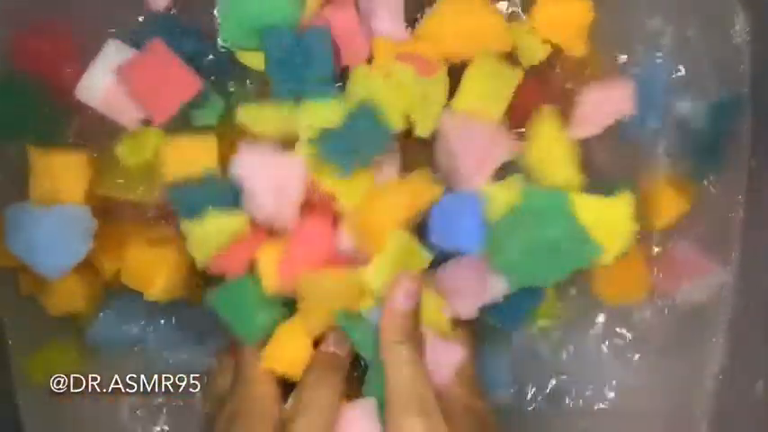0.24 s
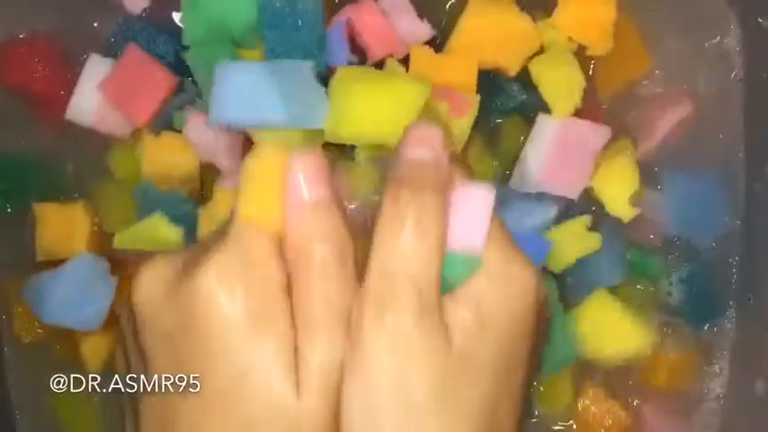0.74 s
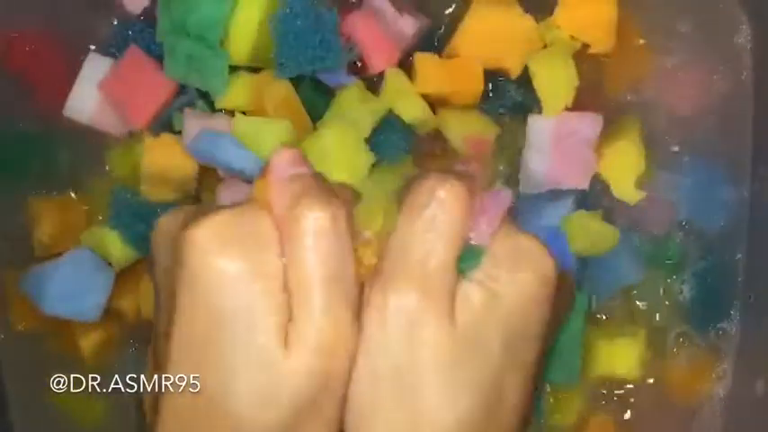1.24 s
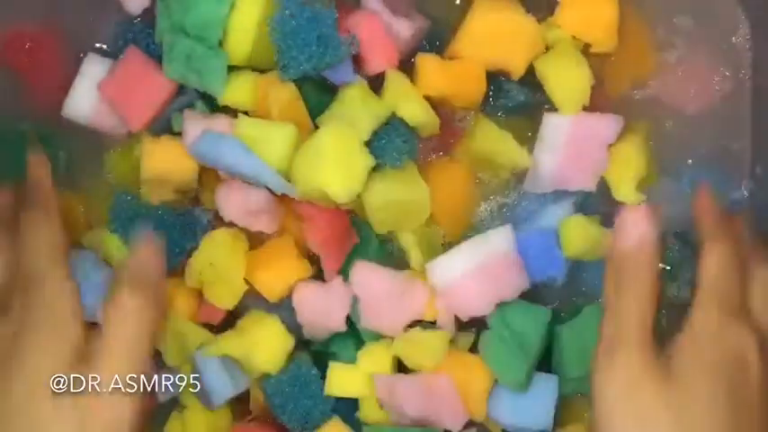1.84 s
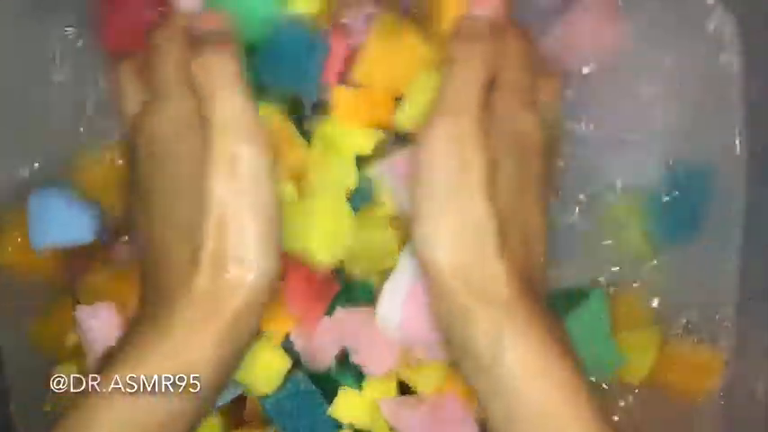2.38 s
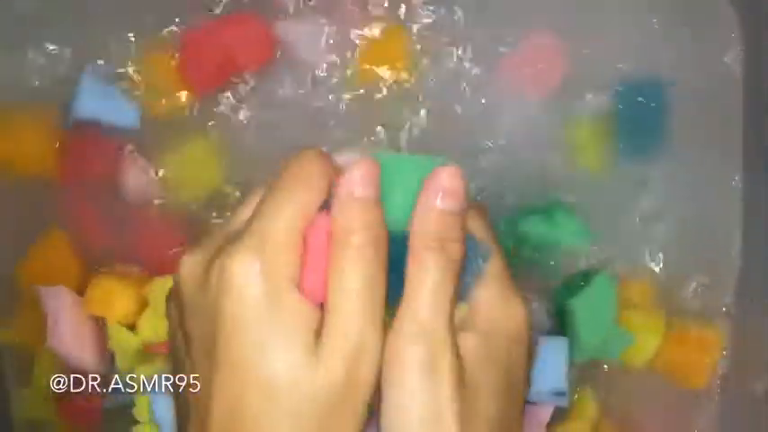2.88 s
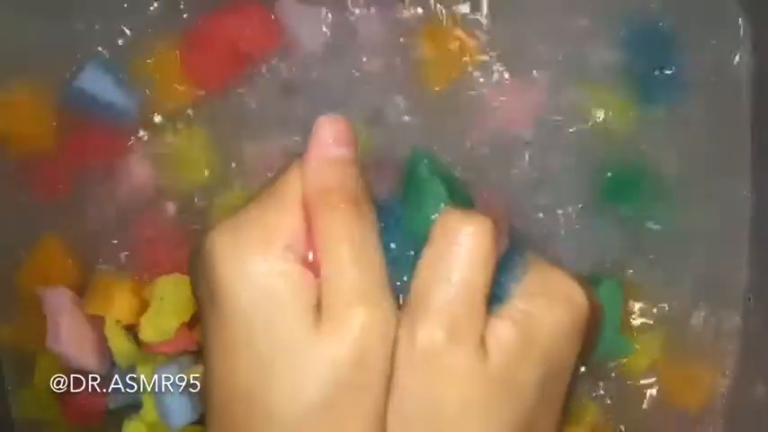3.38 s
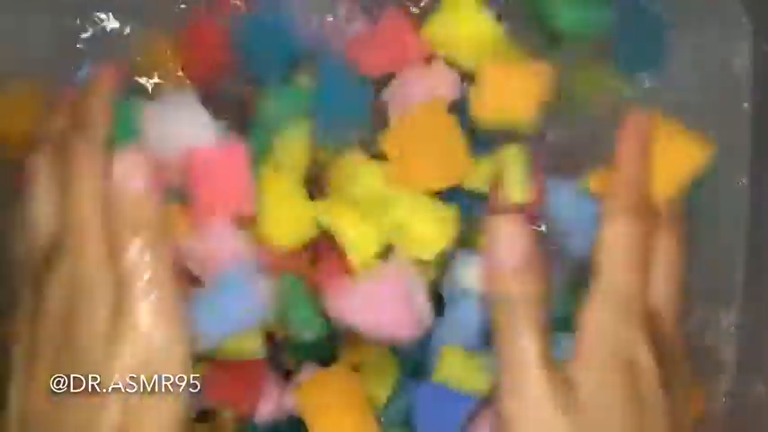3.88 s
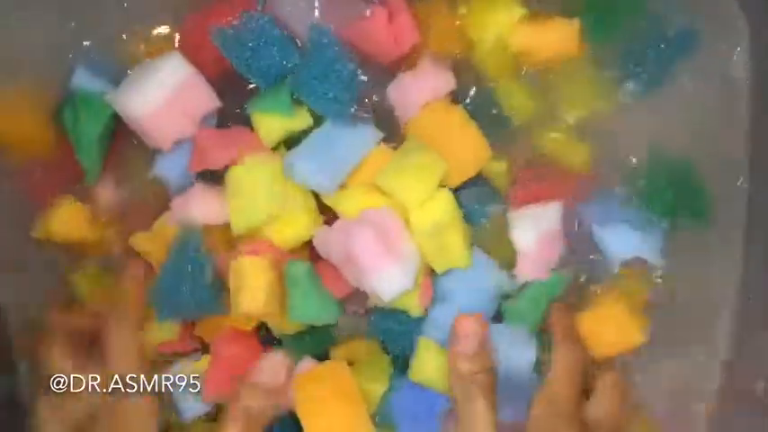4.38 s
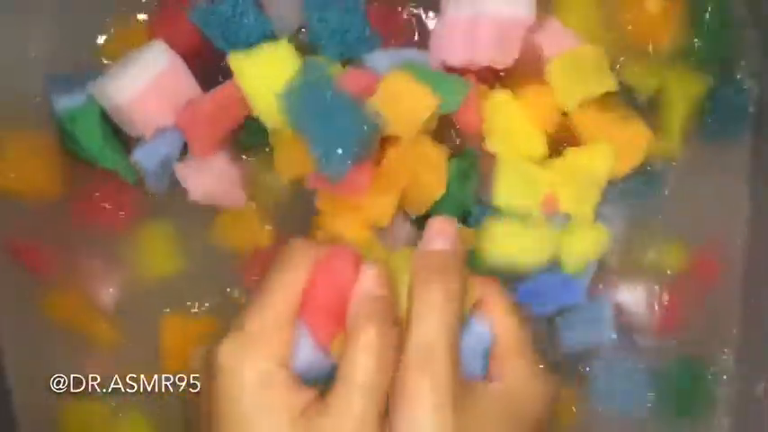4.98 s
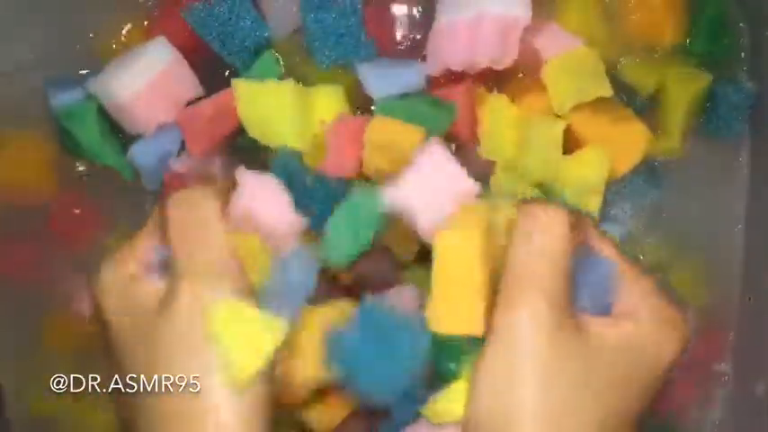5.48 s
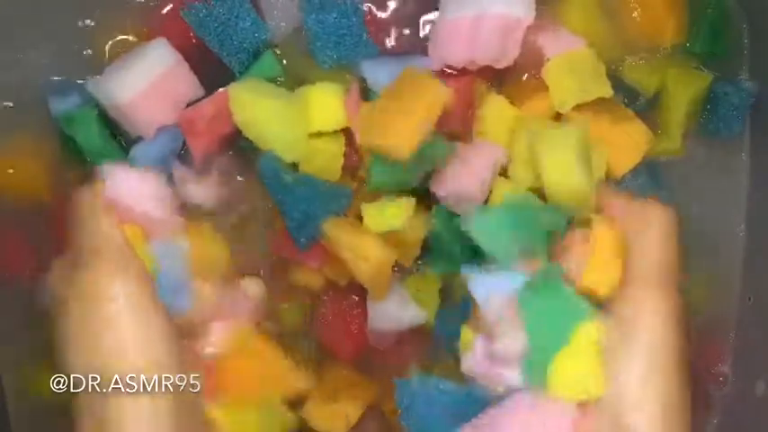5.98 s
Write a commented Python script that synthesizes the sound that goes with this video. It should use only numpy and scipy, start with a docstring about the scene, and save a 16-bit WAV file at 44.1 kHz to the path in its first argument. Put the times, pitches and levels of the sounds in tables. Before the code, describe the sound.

Very close to the microphone, two hands gather and squeeze soaked sponge pieces in a plastic tub. A short rub and squeak leads to a crackling, bubbling rush with sharp squirts and film snaps. Soft bumps and a knock follow, then a second, denser squeeze, hard knocks on the tub wall, a finger squeak, and a third squeeze in shorter spurts. A low machine hum wavers behind in a small room.

```python
"""Two hands gather and squeeze wet sponge pieces in a plastic tub of water, close to the microphone.
Squeezing sends a rush of noise, pore crackle, ringing bubbles and foam fizz out of the sponges.
Squirts burst from it, squelches glide as driven resonances, short rings gurgle and plop, and films snap.
The hands rub, squeak and bump along the tub, and knocks ring its walls as decaying modes.
Behind it a machine hums in the small room: wavering sine tones over a low rumble."""
import sys
import numpy as np
from scipy import signal
from scipy.fft import rfft, irfft, next_fast_len
from scipy.io import wavfile
from scipy.ndimage import uniform_filter1d

SR = 44100
rng = np.random.default_rng(int(sys.argv[2]) if len(sys.argv) > 2 else 0)


def wrap_up_sound(samples):
    """Save the sound to the file named by the first command line argument, as 16-bit audio."""
    columns = np.atleast_2d(samples).T
    # keep every value between -1 and 1, then stretch to whole-number steps
    tamed = np.clip(columns, -1, 1)
    steps = np.round(tamed * 32767).astype(np.int16)
    wavfile.write(sys.argv[1], SR, steps)


N = 274743
TIME = np.arange(N) / SR
LEAD_S = 0.008  # squirts and snaps start to sound this long before they break out

# Colour of hands rubbing, and of water sloshing after a knock: (frequency [Hz], density [dB per Hz])
RUB_COLOUR = [(150, -8), (330, 1), (600, -5), (1000, -5), (1600, -7.5), (2600, -12), (5000, -26)]


def amp(db):
    """Decibels to gain."""
    return 10 ** (np.asarray(db) / 20)


def unit(x):
    """Scales to rms 1."""
    return x / np.sqrt(np.mean(x ** 2) + 1e-20)


def noise(n):
    """White noise, n samples long."""
    return rng.standard_normal(n)


def add(mix, s, sound):
    """Mixes a sound in at time s."""
    part = mix[max(round(s * SR), 0):][:len(sound)]
    part += sound[:len(part)]


def read(points, hz):
    """A spectrum's dB at the given frequencies, interpolated over log frequency."""
    f, db = np.transpose(points)
    return np.interp(np.log(hz + 1), np.log(f + 1), db)


def coloured(x, points):
    """Gives a signal a spectrum, at rms 1."""
    size = next_fast_len(len(x))
    gain = amp(read(points, np.fft.rfftfreq(size, 1 / SR)))
    return unit(irfft(rfft(x, size) * gain, size)[:len(x)])


def levelled(x):
    """Holds the mean level at 1 over about 60 ms while leaving the quick detail."""
    return x / np.sqrt(abs(uniform_filter1d(x ** 2, size=2600)) + 1e-9)


def wander(hz):
    """Smooth chance of rms 1 that changes about hz times a second."""
    knots = noise(8192)
    return unit(np.interp(TIME * hz, np.arange(len(knots)), knots))


def band(x, hz, width_hz):
    """One broad resonance, at rms 1."""
    r = np.exp(-np.pi * width_hz / SR)
    return unit(signal.lfilter([1, 0, -1], [1, -2 * r * np.cos(2 * np.pi * hz / SR), r * r], x))


def resonate(x, hz, width_hz):
    """A resonance of gain 1 that follows the curve hz."""
    turn = np.exp(2j * np.pi * np.cumsum(hz) / SR)
    r = np.exp(-np.pi * width_hz / SR)
    return 2 * (turn * signal.lfilter([1 - r], [1, -r], x / turn)).real


def gesture(start, length, rise_db_per_s, fall_db_per_s):
    """Attack, hold and release of one hand movement, in dB below its hold."""
    rise = (TIME - start) * rise_db_per_s
    fall = (start + length - TIME) * fall_db_per_s
    return np.clip(np.minimum(rise, fall), -90, 0)


def burst(t, length):
    """Envelope of a spray that leaks just before t = 0, breaks out there and dies away."""
    leak_s = 0.00078
    return np.exp(np.minimum(t / leak_s, -t / length))


def pops(per_s, spread_db):
    """Sharp clicks at random moments, a few much larger than the rest."""
    chance, size = rng.random((2, N))
    sizes = amp(spread_db * np.minimum(-np.log(size + 1e-9), 3))
    return (chance < per_s / SR) * rng.choice([-1., 1.], N) * sizes


def bubble(hz, cycles, rise):
    """A bubble swells within a cycle and rings on; a positive rise lifts its pitch as it nears the surface."""
    age = np.arange(int(6 * cycles * SR / hz) + 2) * hz / SR / cycles  # in decay times
    ring = np.sin(2 * np.pi * cycles * age * (1 + rise * age / 2))
    return ring * np.exp(-age) * (1 - np.exp(-1.3 * cycles * age))


def swarm(lo_hz, hi_hz, per_s, cycles, spread_db, clump_db, clump_hz, count=240):
    """Many bubbles of all sizes, swelling in clumps; their mean level is 1."""
    clumps = amp(clump_db * np.clip(wander(clump_hz), -2, 2))
    pitches = np.geomspace(lo_hz, hi_hz, count)
    shapes = [hz * bubble(hz, cycles * rng.uniform(1.0, 1.32), rise=0.031) for hz in pitches]
    when, kind, size = rng.random((int(per_s * N / SR), 3)).T
    at = (when * N).astype(int)
    kinds = (kind * count).astype(int)
    gains = clumps[at] * amp(spread_db * np.minimum(-np.log(size), 3))  # a few are much larger
    out = np.zeros(N + SR)
    for i, k, gain in zip(at.tolist(), kinds.tolist(), gains.tolist()):
        out[i:i + len(shapes[k])] += gain * shapes[k]
    return levelled(out[:N])


def machine():
    """A low hum swells and fades with wavering tones over the room's rumble."""
    # Hum: (time [s], rms level [dB])
    hum_curve = [(0.0, -38.5), (0.69, -49), (0.99, -39), (1.82, -41.5), (2.69, -39), (3.49, -55),
                 (3.75, -40), (4.04, -40), (4.25, -56), (4.53, -54), (4.84, -45.5), (5.48, -39),
                 (5.85, -56), (6.2, -44)]
    # Further machine tones: (frequency [Hz], mean rms level [dB])
    tones = [(86.5, -53.5), (116.5, -54), (172.5, -58)]
    # Rumble of the room: (frequency [Hz], density [dB per Hz])
    rumble_colour = [(20, -31), (40, -5.5), (60, -5), (90, 3), (130, -7), (200, -8), (300, -17),
                     (500, -28.5), (1000, -29.5), (2000, -52), (5000, -61), (16000, -84)]
    hum_hz, rumble_db = 57.5, -45
    s, db = np.transpose(hum_curve)
    hum = amp(np.interp(TIME, s, db)) * np.sin(2 * np.pi * hum_hz * TIME + 0.055 * wander(2.65))
    for hz, level_db in tones:
        level = amp(level_db + 3.4 * wander(2.404))
        hum += level * np.sin(2 * np.pi * hz * TIME + 1.4 * wander(4))
    return np.sqrt(2) * hum + amp(rumble_db) * coloured(noise(N), rumble_colour)  # sqrt(2): sines to rms


def echoes(x, walls_db, room_db, t60):
    """Quick reflections off the tub's walls, then the room's faint tail, strongest in the low middle."""
    # Colour of the tail: (frequency [Hz], level [dB])
    tail_colour = [(150, 2), (370, 3.5), (1350, -1), (2000, -8), (2800, -5), (5000, -9), (16000, -10.5)]
    t = np.arange(SR // 2) / SR
    taps = rng.choice([-1., 1.], len(t)) * (rng.random(len(t)) < 3000 / SR)
    walls = taps * (t > .001) * np.exp(-t / 0.0036)
    tail = coloured(taps, tail_colour) * (t > .007) * amp(-60 * t / t60)
    response = amp(walls_db) * walls / np.linalg.norm(walls)
    response += amp(room_db) * tail / np.linalg.norm(tail)
    return signal.oaconvolve(x, response)[:N]


def strokes():
    """Hands slide along the tub: lumpy noise that grows through each stroke and starts and stops quickly."""
    # Strokes: (start [s], length [s], level before the swell [dB])
    slides = [(0.042, 0.17, -43.5), (2.124, 0.37, -52.5), (4.41, 0.18, -48.5)]
    swell_db_per_s, edge_db_per_s, lumps_db = 8.5, 260, 4
    out = np.zeros(N)
    grain = coloured(noise(N) * amp(lumps_db * wander(220)), RUB_COLOUR)
    for s, length, db in slides:
        swell_db = swell_db_per_s * np.clip(TIME - s, 0, length)
        out += amp(db + swell_db + gesture(s, length, edge_db_per_s, edge_db_per_s)) * grain
    return out


def squeaks():
    """Wet skin sticks and slips on plastic: gliding harmonics around a bright peak, mixed with scuffing."""
    # Squeaks: (start [s], length [s], level [dB], first pitch [Hz], last pitch [Hz],
    # brightest frequency [Hz], roughness [0-1], settling into the fundamental [0-1])
    slip_events = [(0.071, 0.029, -34.5, 272, 261, 1600, 0.52, 0),
                   (0.09, 0.035, -34.5, 389, 350, 1200, 0.3, 0.75),
                   (0.149, 0.04, -33.5, 555.5, 580, 1510, 0.22, 0.12),
                   (2.397, 0.03, -34, 488, 438, 1390, 0.6, 0),
                   (2.414, 0.031, -36.5, 459, 314, 885, 0.58, 0.4),
                   (4.533, 0.053, -29, 411.7, 350, 1240, 0.25, 1)]
    out = np.zeros(N)
    for s, length, db, first_hz, last_hz, bright_hz, rough, settle in slip_events:
        n = int(length * SR)
        pitch = np.linspace(first_hz, last_hz, n) * (1 + 0.0063 * wander(300)[:n])
        turn = 2 * np.pi * np.cumsum(pitch) / SR
        slips = np.zeros(n)
        for k in range(1, 8):
            odd = k % 2 * .5 / k ** 1.1  # odd harmonics only
            peak = 1 / (1 + (np.log2(k * first_hz / bright_hz) / 0.29) ** 2)
            slips += (odd + peak) * np.cos(k * turn + k * k)
        settled = settle * np.linspace(0, 1, n)
        slips = (1 - settled) * slips + 2 * settled * np.cos(turn + 1)
        scuff = (1 - settled) * band(noise(n), bright_hz, width_hz=340)
        squeak = unit((1 - rough) * unit(slips) + rough * scuff)
        add(out, s, amp(db) * squeak * signal.windows.tukey(n, .65))
    return out


def bumps():
    """Soft bumps of the hands through the water, each a low ring that dies within a cycle or so."""
    # Bumps: (time [s], level [dB], pitch [Hz])
    contacts = [(0.223, -17, 147), (1.632, -18, 125), (2.006, -15.5, 104)]
    out = np.zeros(N)
    for s, db, hz in contacts:
        add(out, s, amp(db) * bubble(hz, cycles=0.76, rise=0))
    return out


def knocks():
    """A knuckle strikes and rebounds; the wall thuds, rings differently at each spot, and the water sloshes."""
    # Knocks: (time [s], relative level [dB], tilt [dB per octave], stiffness of the spot [pitch factor],
    # rebound delay [s], relative rebound level [dB], thud level [dB])
    strikes = [(1.9392, -23, 0, 0.99, 0.0019, -1, -37), (1.9974, -30, -1.5, 1.03, 0.0083, -16, -18),
               (4.136, -31.5, -0.5, 0.99, 0.002, -13, -29), (4.170, -38, -3.5, 1.19, 0.0024, -7, -42),
               (4.1784, -27.5, -1, 0.943, 0.00158, -3, -20.5), (4.228, -37, -2, 1.01, 0.0023, -7, -41)]
    # Modes of the tub: (frequency [Hz], relative level [dB], decay by 60 dB [s])
    modes = [(264, -1, 0.12), (315, 0.5, 0.21), (414, 5, 0.073), (684, 9.5, 0.021), (910, 9.5, 0.01),
             (1136, 8.5, 0.021), (1475, 10.5, 0.013), (2080, 9, 0.012), (2430, 9.5, 0.0079),
             (3590, 14.5, 0.0031), (6130, 6.5, 0.0058)]
    thud = bubble(354, cycles=1.66, rise=0)  # the wall gives and the water damps it
    out, t = np.zeros(N), np.arange(SR // 4) / SR
    for s, db, tilt_db, stiffness, rebound_s, rebound_db, thud_db in strikes:
        ring = np.zeros(len(t))
        for k, (hz, mode_db, t60) in enumerate(modes):
            level = amp(mode_db + tilt_db * np.log2(hz / 1000) - 60 * t / t60)
            ring += (-1) ** k * level * np.sin(2 * np.pi * hz * stiffness * t)
        crack = amp(tilt_db) * band(noise(len(t)), 3250, width_hz=1400) * np.exp(-t / 0.0009)
        smack = band(noise(len(t)), 1200, width_hz=2100) * np.exp(-t / 0.0018)
        slosh = coloured(noise(len(t)), RUB_COLOUR) * np.exp(-t / 0.034)
        strike = ring + amp(-3.0) * crack + amp(2.0) * smack + amp(-9) * slosh
        add(out, s, amp(db - 7.0) * strike)
        add(out, s + rebound_s, amp(db - 10.0 + rebound_db) * (ring + crack))
        add(out, s + 0.0011, amp(thud_db) * thud)
    return out


def short_rings():
    """Bubbles, gurgles, soft plops and one ring of a knock: decaying tones, each with a brief higher onset."""
    # Short rings: (time [s], level [dB], pitch [Hz], ring [cycles])
    ring_events = [(.297, -26, 2240, 6.8), (.408, -29, 786, 2.8), (0.447, -26, 940, 4.8),
                   (1.614, -25, 1120, 0.78), (2.267, -33, 2300, 6), (2.841, -27, 2700, 11),
                   (2.910, -21, 1015, 6.9), (2.988, -35, 1650, 7.3), (3.069, -31.5, 1054, 7.1),
                   (4.169, -26, 1400, 4.4), (4.374, -32, 1790, 4.2), (4.975, -33, 2800, 6.3),
                   (5.032, -32, 1850, 4.7), (5.153, -18, 1334, 4.8), (5.429, -30, 1600, 2.7),
                   (6.0405, -18.5, 11560, 21)]
    out = np.zeros(N)
    for s, db, hz, cycles in ring_events:
        add(out, s, amp(db) * bubble(hz, cycles, rise=0.02))
        add(out, s, amp(db) * bubble(1.46 * hz, cycles=1.84, rise=0))  # the higher onset
    return out


def snaps():
    """Thin films of water snap: a brief spray, a tearing tick, and a ring that starts first and outlasts it."""
    # Snaps: (time [s], relative level [dB], centre [Hz])
    films = [(0.134, -28.5, 7600), (0.406, -22, 9800), (0.7352, -15, 5310), (0.934, -24, 8400),
             (0.998, -17.5, 5240), (1.1742, -15.5, 8030), (1.187, -20.5, 8660), (1.245, -19, 7780),
             (1.465, -28, 6100), (1.5634, -14.5, 12300), (1.614, -16, 9940), (1.718, -25.5, 11000),
             (3.1214, -14.5, 9030), (3.348, -15, 8500), (3.43, -17, 9600), (3.5388, -15.5, 5760),
             (3.857, -18, 5700), (3.877, -26, 8600), (3.901, -23, 8360), (4.043, -33, 7300),
             (4.5285, -26, 11700), (5.153, -20, 12800), (5.631, -19, 11450), (5.671, -19, 7440),
             (5.686, -18.5, 6800), (5.7929, -14.5, 8100), (5.8254, -15, 6700), (6.008, -21, 5450),
             (6.097, -26, 6260)]
    out, t = np.zeros(N), np.arange(SR // 30) / SR - LEAD_S
    for s, db, hz in films:
        spray = band(noise(len(t)), hz, width_hz=11500) * burst(t - .001, length=0.0019)
        add(out, s - LEAD_S, amp(db - 8.5) * spray)
        add(out, s + .001, amp(db + 1) * bubble(1.34 * hz, cycles=.7, rise=0))  # the film tears
        # a ringing bubble that starts just before the tick and outlasts it
        add(out, s + 0.00049, amp(db - 8.5) * bubble(hz, cycles=18.0, rise=0))
    return out


def glides():
    """Wet squelches and one faint finger squeak: random clicks drive a resonance whose pitch glides."""
    # Gliding resonances, wet squelches and one faint squeak of a finger at 4.506 s:
    # (start [s], length [s], level [dB], first pitch [Hz], last pitch [Hz])
    glide_events = [(0.708, 0.021, -36.5, 2250, 3100), (0.906, 0.029, -39, 1380, 2900),
                    (0.921, 0.053, -40.5, 1900, 3100), (1.056, 0.048, -37.5, 1670, 2580),
                    (1.113, 0.053, -41.5, 2050, 2130), (1.233, 0.067, -41.5, 2800, 2880),
                    (1.347, 0.03, -39, 2030, 2170), (2.929, 0.04, -46, 1100, 1170),
                    (2.975, 0.098, -49.5, 1410, 1080), (3.682, 0.055, -39, 2440, 2930),
                    (4.506, .026, -44, 940, 850), (5.164, .05, -53, 1420, 1500)]
    out, clicks = np.zeros(N), pops(per_s=1800, spread_db=3.0)
    for s, length, db, first_hz, last_hz in glide_events:
        n = int(length * SR)
        pitch = np.geomspace(first_hz, last_hz, n)
        width_hz = 0.13 * first_hz ** 2 / 2000  # low pitches ring longer
        ring = resonate(clicks[int(s * SR):][:n], pitch, width_hz)
        ring = resonate(ring, pitch, 3 * width_hz)
        add(out, s, amp(db) * unit(ring) * signal.windows.tukey(n, .5))
    return out


def squirt(db, hz, length, cycles=7, spray_db=-12, crack_db=-14, followers_db=-8, count=8):
    """A film leaks and cracks, a main bubble bursts out with crackling spray, and other sizes follow."""
    t = np.arange(SR // 10) / SR - LEAD_S
    droplets = noise(len(t)) * (rng.random(len(t)) < 5000 / SR)
    out = amp(spray_db) * band(droplets, hz, 1.3 * hz) * burst(t, length)
    out += amp(crack_db) * band(noise(len(t)), hz, width_hz=1100) * np.exp(-abs(t) / 0.0012)
    add(out, LEAD_S, bubble(hz, cycles, rise=0.029))
    for delay, octaves, size in rng.random((count, 3)):
        follower = bubble(hz * 2 ** (1.336 * (octaves - .6)), cycles=2.74, rise=0.081)
        add(out, LEAD_S + 1.7 * length * delay, amp(followers_db - 5.0 * size) * follower)
    return amp(db) * out


def squirts():
    """Bursts of bubbles forced out of a sponge, heard one by one above the rush."""
    # Squirts: (time [s], level [dB], main bubble pitch [Hz], decay time of the spray [s])
    outbursts = [(.403, -29, 1700, 0.0062), (0.4684, -17.5, 3790, 0.004), (0.477, -28, 6100, 0.0037),
                 (0.4858, -17.5, 3350, 0.0062), (0.662, -27, 3360, 0.0028), (0.6736, -19, 3280, 0.0016),
                 (0.7212, -27, 1536, 0.0042), (.735, -17.5, 2990, 0.0067), (0.84, -22.5, 2350, 0.0064),
                 (.856, -23.5, 3740, 0.0032), (.871, -23, 2730, 0.0025), (.9888, -25, 3050, 0.0027),
                 (1.028, -18, 2730, 0.006), (1.04, -19, 1270, 0.0045), (1.114, -21, 1960, 0.00422),
                 (1.498, -19.5, 3150, 0.0045), (2.385, -34, 3280, 0.0043), (2.978, -31, 2620, .003),
                 (3.029, -19, 4020, 0.0045), (3.039, -27, 2530, 0.0021), (3.093, -20.5, 3000, 0.0087),
                 (3.147, -24, 2580, 0.0041), (3.1707, -17, 2760, 0.002), (3.179, -21, 2870, 0.0073),
                 (3.2277, -20.5, 1320, 0.0045), (3.2537, -13.5, 2850, 0.0033), (3.278, -19.5, 2870, 0.0047),
                 (3.286, -23.5, 1440, 0.006), (3.316, -19.5, 2080, 0.0071), (3.345, -17, 2720, 0.006),
                 (3.368, -19.5, 2740, 0.0067), (3.381, -23.5, 1465, 0.0062), (3.457, -19, 3420, 0.01),
                 (3.5144, -15.5, 3530, 0.0032), (3.6242, -25, 2850, 0.0052), (3.774, -27, 2120, 0.0094),
                 (5.151, -24, 3010, 0.0036), (5.214, -23.5, 4380, 0.0057), (5.441, -29, 4020, .005),
                 (5.495, -29.5, 2420, 0.0072), (5.513, -32, 2600, 0.004), (5.531, -31.5, 2660, 0.0054),
                 (5.585, -25, 4630, 0.0054), (5.67, -22, 3430, .003), (5.715, -22.5, 3240, 0.006),
                 (5.7341, -17.5, 2970, 0.0033), (5.741, -18.5, 2740, 0.0049), (5.763, -16, 3050, 0.0067),
                 (5.7928, -18, 2690, 0.0024), (5.831, -21, 1580, 0.0045), (5.855, -21.5, 3270, 0.0032),
                 (5.925, -19.5, 4140, 0.0028), (6.0092, -24.5, 2140, 0.0041), (6.2108, -27, 4200, 0.0018)]
    out = np.zeros(N)
    for s, db, hz, length in outbursts:
        add(out, s - LEAD_S, squirt(db, hz, length))
    return out


def flows():
    """Stirring and pressing add up in power to the levels of large bubbles, small bubbles and foam, in dB."""
    # Handfuls gathered, keeping the water stirred: (start [s], length [s], level of small bubbles [dB])
    handfuls = [(0.192, 1.482, -55), (2.347, 1.61, -57), (4.448, 1.698, -55.5)]
    # Fingers pressing on the sponges: (start [s], length [s], level of small bubbles [dB],
    # large bubbles against small [dB], foam against small [dB])
    presses = [(0.71, 0.072, -45, -5.5, -7), (0.85, 0.16, -42.5, -7, -9), (1.04, 0.17, -41.5, -7, -2),
               (1.335, 0.043, -41, -4, -1.5), (1.486, 0.08, -53.5, -3, 0), (2.182, 0.12, -54, 2, -10),
               (2.782, 0.075, -66, 6, 15.5), (3.01, 0.11, -46, -20, -7), (3.13, 0.61, -41.5, -2, -5),
               (3.268, 0.27, -38.5, -8, -4), (3.872, 0.017, -53.5, 2.5, 4.5), (4.4, 0.13, -57, 3, -14),
               (5.105, 0.11, -51, -3.5, 0.5), (5.451, 0.072, -51, -7, -2), (5.647, 0.07, -43.5, -17, -2),
               (5.719, 0.12, -41.5, -8, 1.5), (5.824, 0.115, -41.5, -6, -9), (6.011, 0.022, -47, -0.5, -10),
               (6.066, 0.021, -47, -14, -7)]
    # Faint fizz of soaked sponges left alone: large bubbles [dB], small bubbles [dB], foam [dB]
    still_db = (-64, -67, -65.5)
    stir_large_db, stir_foam_db = -3.5, 2  # against the small bubbles of stirred water
    rise_db_per_s, fall_db_per_s = 214, 286  # the flow builds up, holds, and dies away as the grip eases
    foam_fall_db_per_s = 132  # foam goes on fizzing a little longer
    stirs = [(*row, stir_large_db, stir_foam_db) for row in handfuls]
    power = np.outer(amp(still_db) ** 2, np.ones(N))
    for start, length, db, large_db, foam_db in stirs + presses:
        wet = amp(db + gesture(start, length, rise_db_per_s, fall_db_per_s))
        foam = amp(db + gesture(start, length, rise_db_per_s, foam_fall_db_per_s))
        power += np.square([wet * amp(large_db), wet, foam * amp(foam_db)])
    return 10 * np.log10(power)


def strays(flow_db, pressure, pore_hz):
    """Small bubbles escape at random and chirp upwards: the harder the press, the more and the louder."""
    most_per_s, over_flow_db, octaves = 70, 7.5, 1.3
    out = np.zeros(N)
    for when, chance, size in rng.random((int(most_per_s * N / SR), 3)):
        i = int(when * N)
        if chance < pressure[i] ** 2:
            hz = pore_hz[i] * 2 ** (octaves * (size - .7))  # near the prevailing bubble size
            add(out, i / SR, amp(flow_db[i] + over_flow_db) * bubble(hz, cycles=7.9, rise=0.087))
    return out


def sponges():
    """Light pressure gives a smooth rush through the pores; hard pressure breaks it into crackle and bubbles."""
    # Typical bubble pitch, drifting as the pores close, one table a squeeze: (time [s], pitch [Hz])
    pores = [
        [(0.6, 2390), (0.662, 3100), (0.904, 2440), (1.42, 2500), (1.45, 3200)],
        [(3.0, 3600), (3.056, 3090), (3.414, 2410), (3.492, 2810), (3.8, 2340)],
        [(5.45, 2470), (5.61, 3640), (5.83, 2550), (5.946, 3900), (6.0, 2630)],
    ]
    # Colours of large bubbles, small bubbles, foam, parting pore walls and the water heaving in the tub:
    # (frequency [Hz], density [dB per Hz])
    large_colour = [(120, -26), (250, -1), (550, -2), (800, -1.5), (1350, -4.5), (1750, -8.5), (2100, -4.5),
                    (3000, -51)]
    small_colour = [(1300, -29), (2050, -3), (2900, -0.5), (3800, 0), (4900, -6), (5500, -3.5), (9500, -27)]
    foam_colour = [(3000, -38), (5000, -5), (6500, -1), (9300, 0), (10400, -6.5), (11500, -1.5),
                   (14000, -5), (16000, -3)]
    crackle_colour = [(500, -6), (1200, -13), (2800, -7), (5000, -13.5), (9000, -10), (16000, -19)]
    slosh_colour = [(150, -12), (280, -7), (380, -4.5), (470, -4), (600, -9), (1200, -23), (4000, -62)]
    crackle_db, slosh_db = -6, -8  # against the small bubbles, against the large ones
    large_db, small_db, foam_db = flows()
    pressure = np.clip((small_db + 64.5) / 15, .15, 1)
    spurts = amp(1.9 * pressure * wander(130))  # neighbouring pores let go together

    large = swarm(963, 2263, per_s=1400, cycles=3.5, spread_db=3.5, clump_db=6.5, clump_hz=129.7)
    palms = band(large, 1390, width_hz=310)  # the hollow of the cupped hands
    large = levelled(large + pressure * palms / 2)
    small = swarm(1488, 6980, per_s=2600, cycles=4.5, spread_db=6.0, clump_db=3.0, clump_hz=221.0)
    pore_hz = np.interp(TIME, *np.vstack(pores).T)
    small = levelled(small + amp(-6.5) * resonate(small, pore_hz, width_hz=1600))  # one size prevails
    foam = swarm(4720, 15100, per_s=3000, cycles=3.8, spread_db=7.0, clump_db=4.0, clump_hz=131.2)

    crackle = coloured(pops(per_s=900, spread_db=3.0), crackle_colour)
    out = amp(small_db + crackle_db) * pressure * crackle
    out += amp(large_db + slosh_db) * coloured(noise(N), slosh_colour)
    share = pressure ** 2  # part of the power that is in bubbles, the rest being smooth rush
    layers = ((large, large_colour, large_db), (small, small_colour, small_db), (foam, foam_colour, foam_db))
    for bubbles, colour, db in layers:
        rush = coloured(noise(N), colour)
        flow = np.sqrt(share) * coloured(bubbles, colour) + np.sqrt(1 - share) * rush
        out += flow * amp(db)
    return out * spurts + strays(small_db, pressure, pore_hz)


def scene():
    """Everything in the tub, its echoes, and the hum."""
    contact = strokes() + squeaks() + bumps() + knocks()
    details = short_rings() + snaps() + glides() + squirts()
    tub = contact + details + sponges()
    return (tub + echoes(tub, walls_db=-11.0, room_db=-19.0, t60=0.36) + machine())[None]


def record(dry):
    """The microphone's bass roll-off and the recorder's band limit."""
    thin = signal.sosfilt(signal.butter(3, 36, "highpass", fs=SR, output="sos"), dry)
    band_limit = signal.firwin(511, 16050, window=("kaiser", 9), fs=SR)
    return signal.oaconvolve(thin, band_limit[None], "same")


dry = scene()
out = record(dry)
wrap_up_sound(out)
```